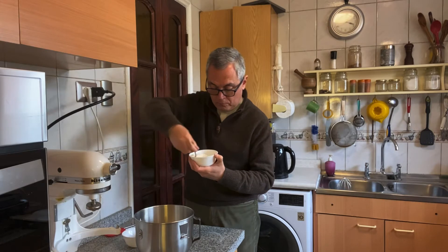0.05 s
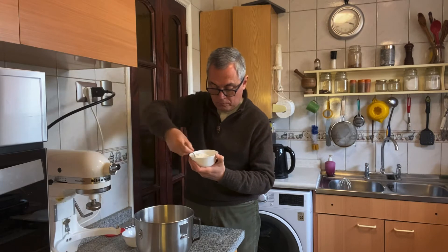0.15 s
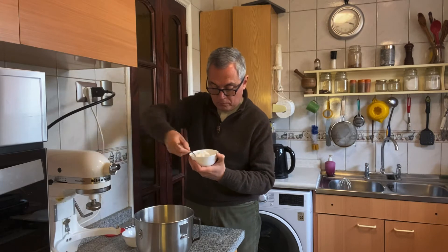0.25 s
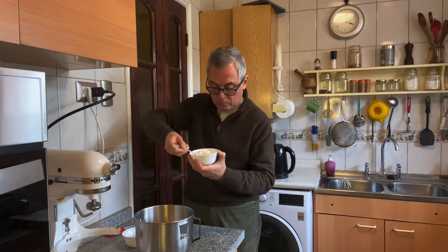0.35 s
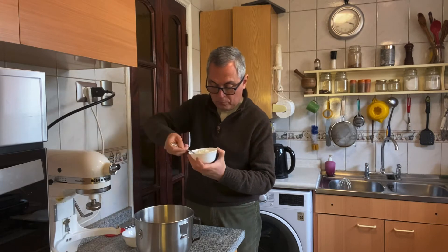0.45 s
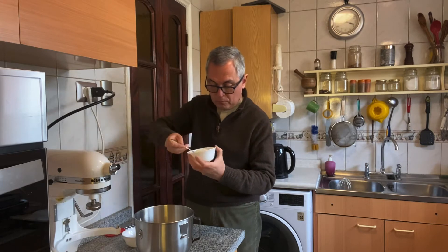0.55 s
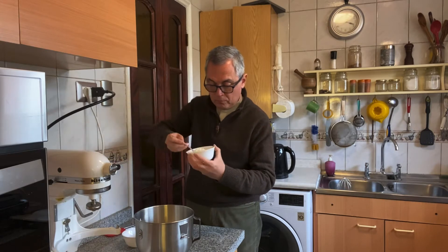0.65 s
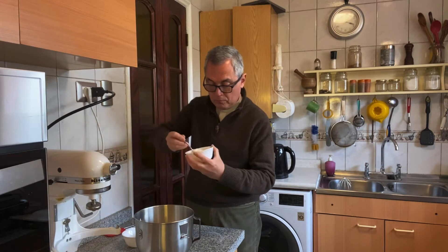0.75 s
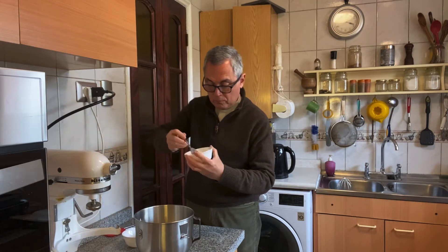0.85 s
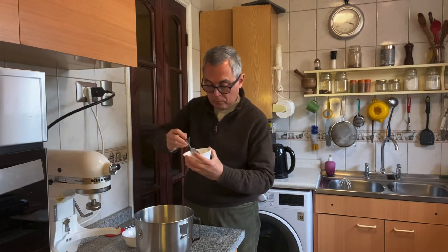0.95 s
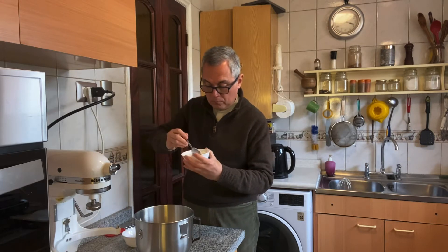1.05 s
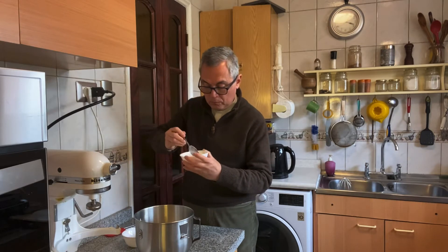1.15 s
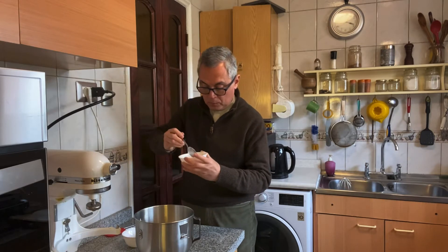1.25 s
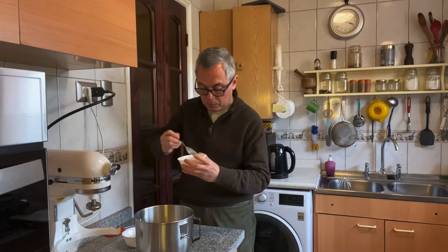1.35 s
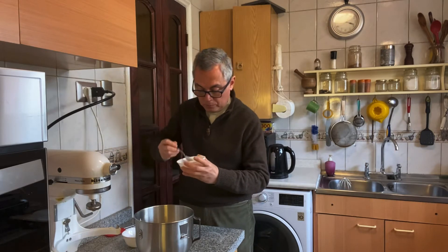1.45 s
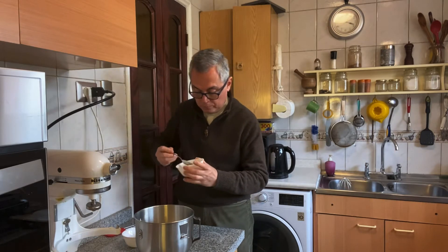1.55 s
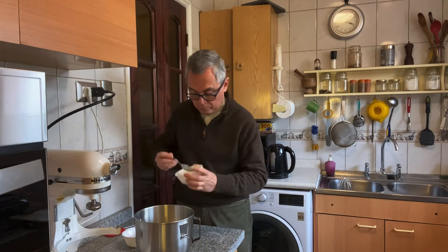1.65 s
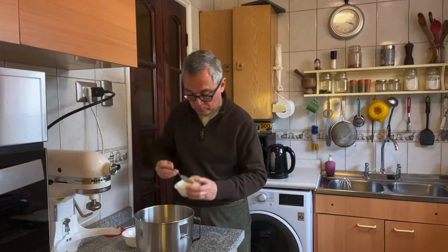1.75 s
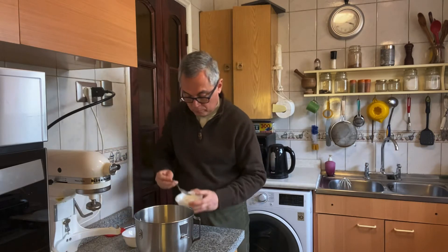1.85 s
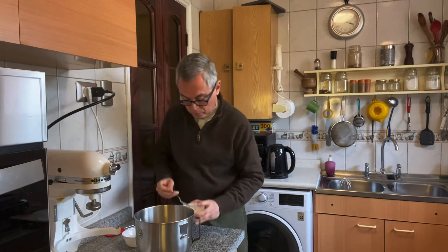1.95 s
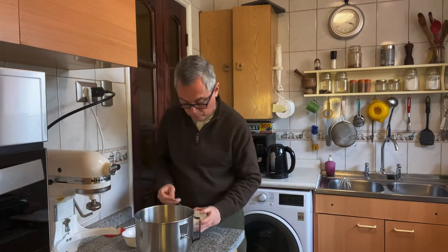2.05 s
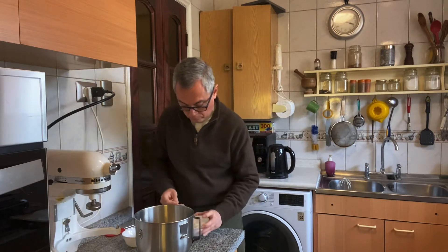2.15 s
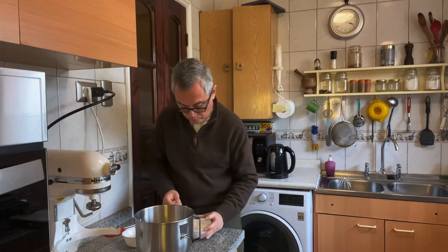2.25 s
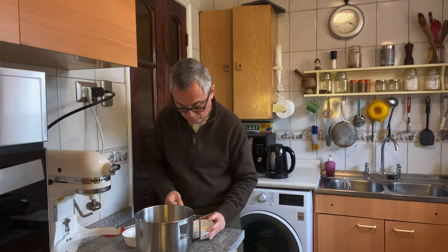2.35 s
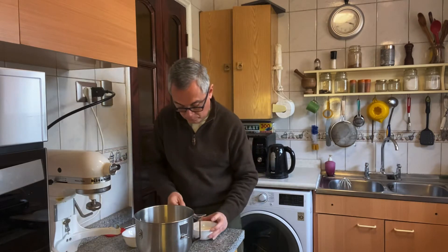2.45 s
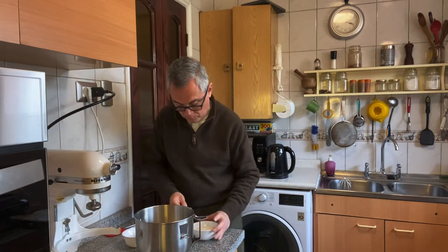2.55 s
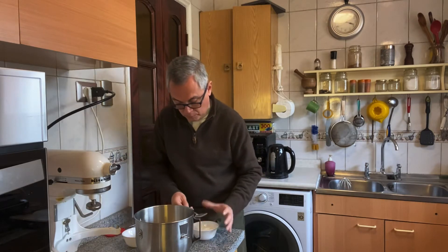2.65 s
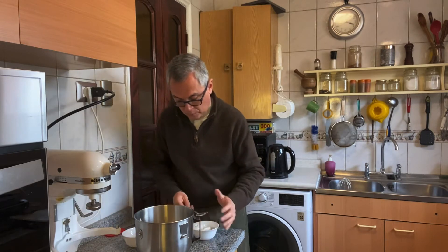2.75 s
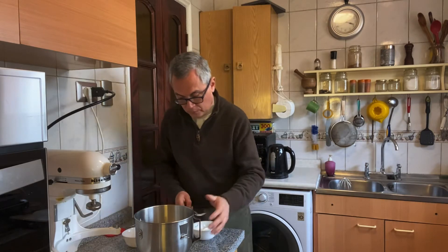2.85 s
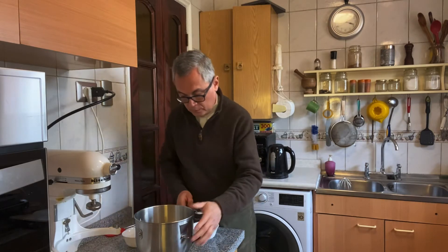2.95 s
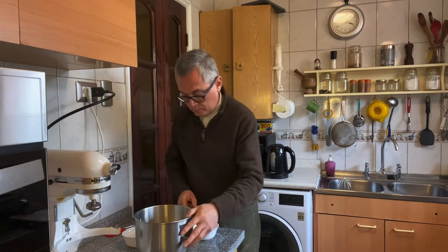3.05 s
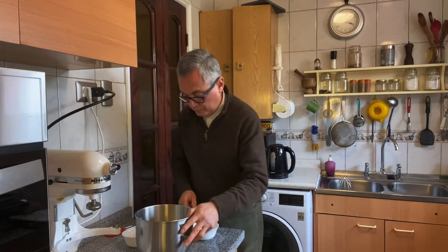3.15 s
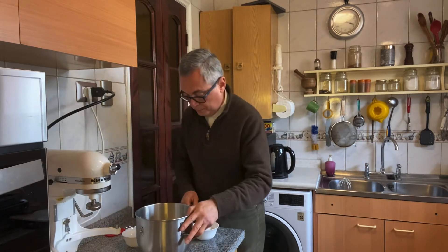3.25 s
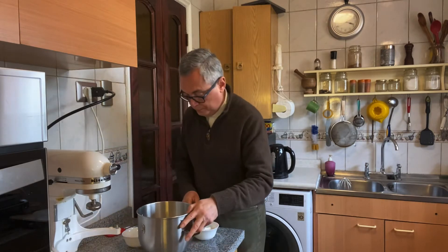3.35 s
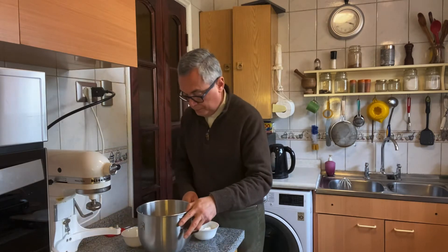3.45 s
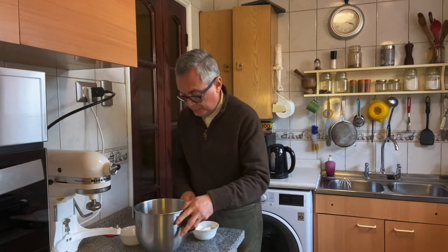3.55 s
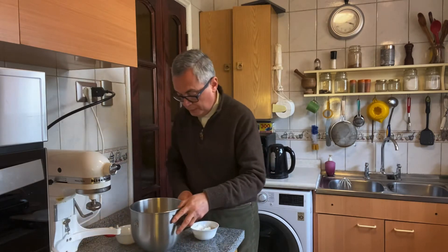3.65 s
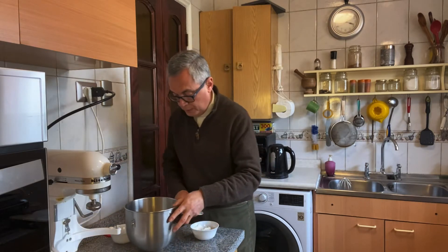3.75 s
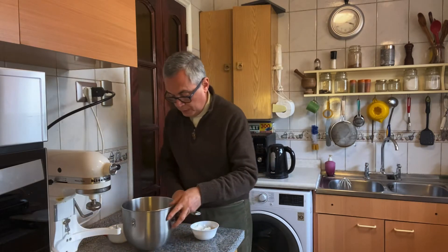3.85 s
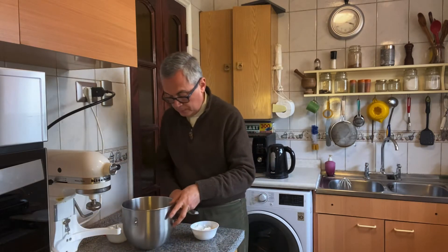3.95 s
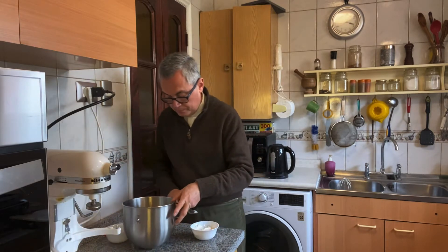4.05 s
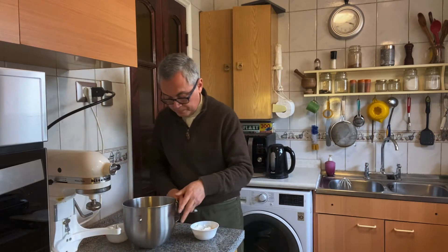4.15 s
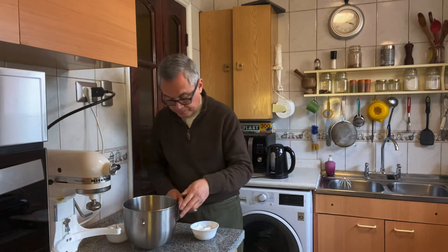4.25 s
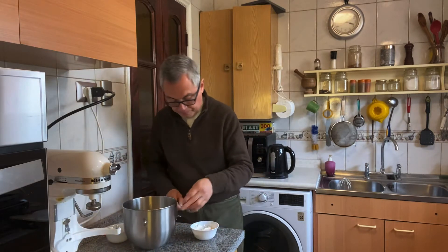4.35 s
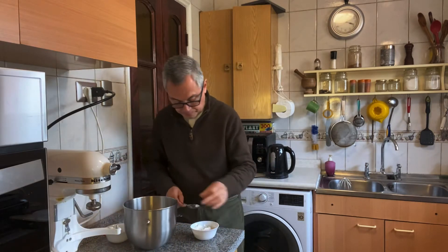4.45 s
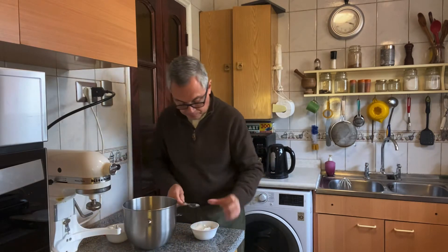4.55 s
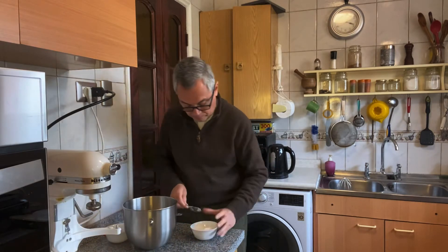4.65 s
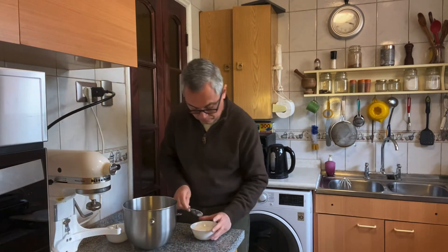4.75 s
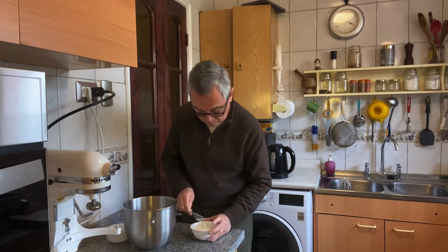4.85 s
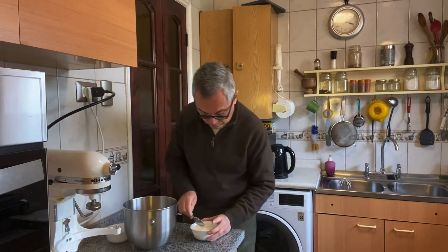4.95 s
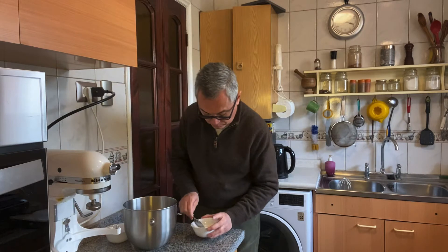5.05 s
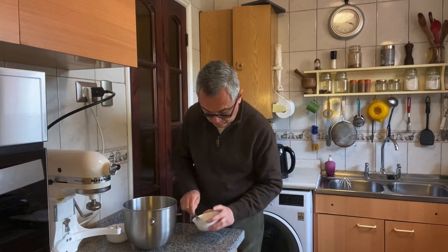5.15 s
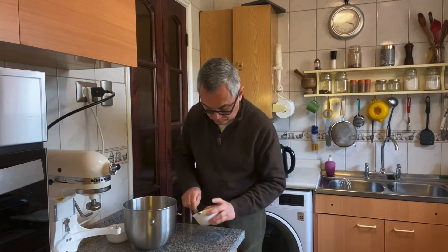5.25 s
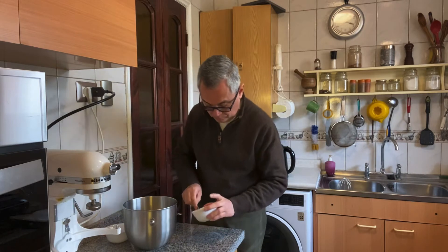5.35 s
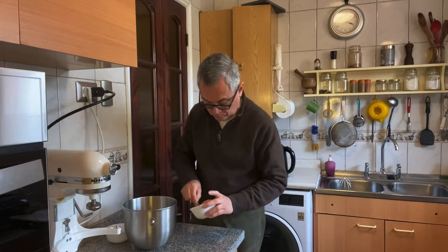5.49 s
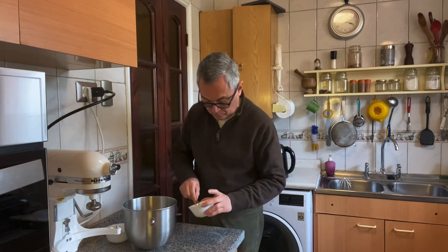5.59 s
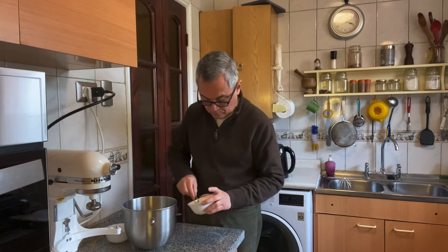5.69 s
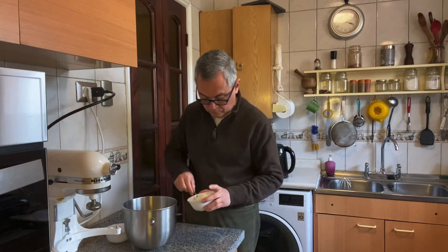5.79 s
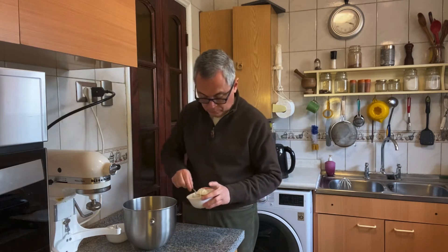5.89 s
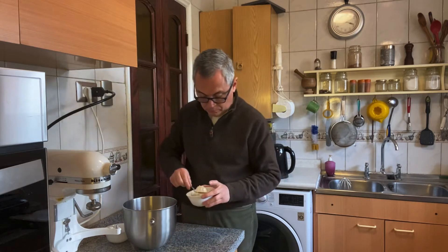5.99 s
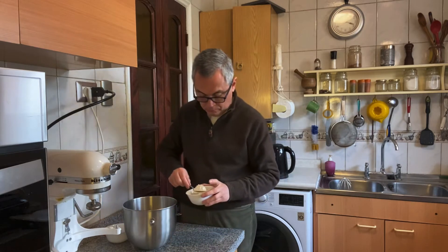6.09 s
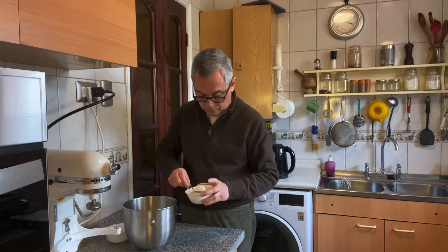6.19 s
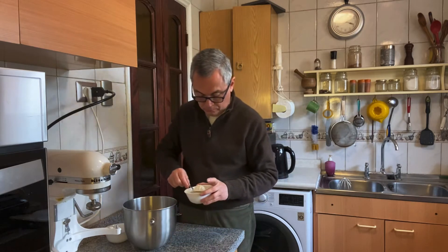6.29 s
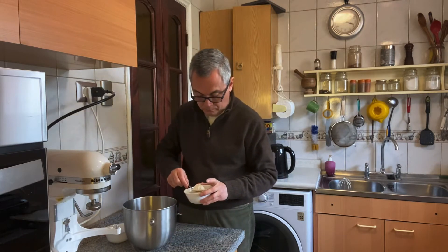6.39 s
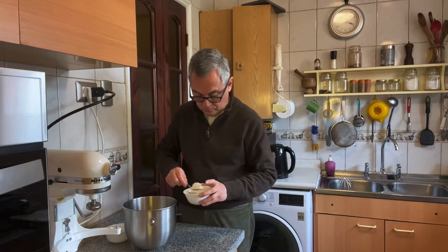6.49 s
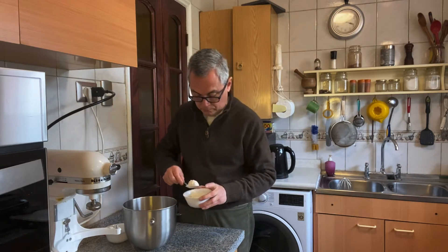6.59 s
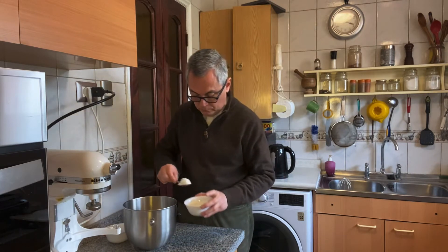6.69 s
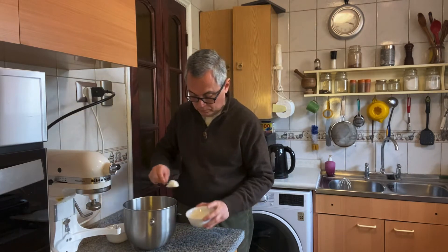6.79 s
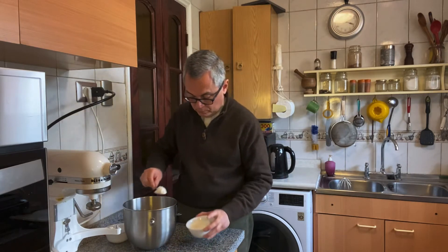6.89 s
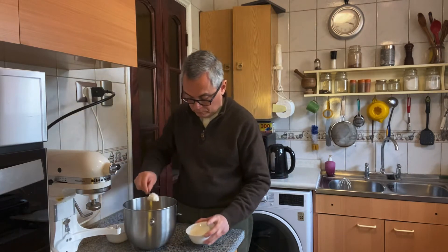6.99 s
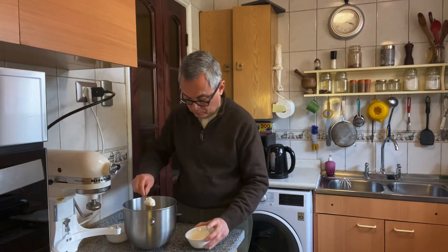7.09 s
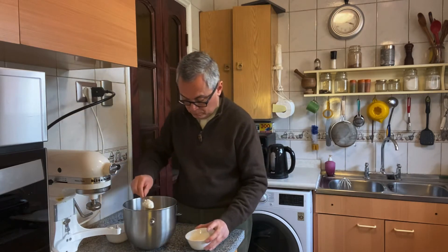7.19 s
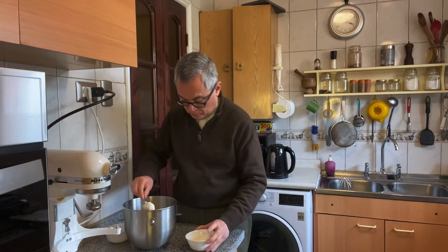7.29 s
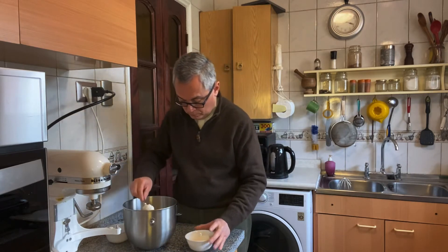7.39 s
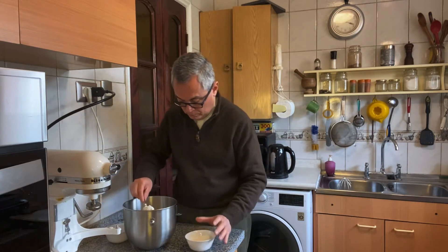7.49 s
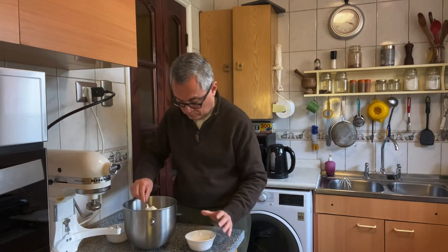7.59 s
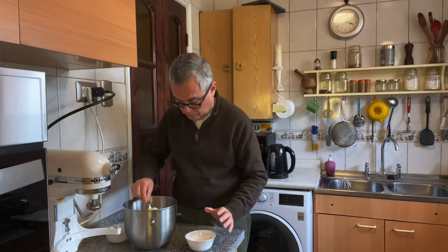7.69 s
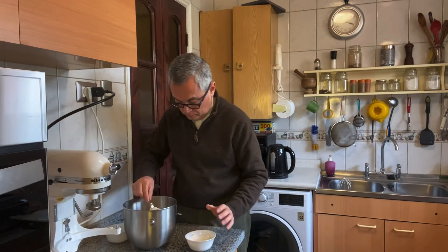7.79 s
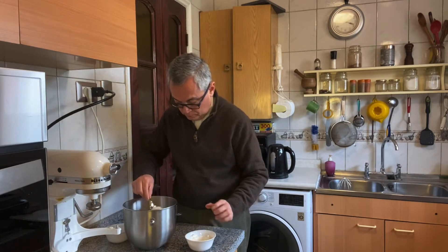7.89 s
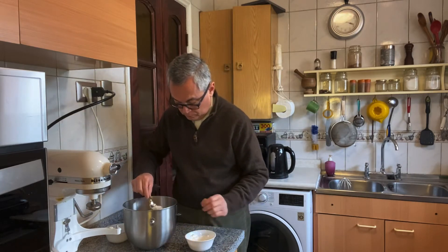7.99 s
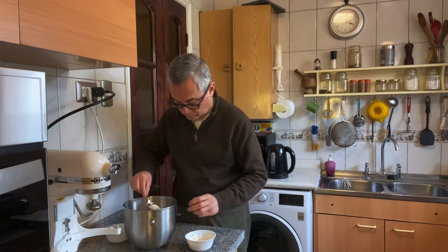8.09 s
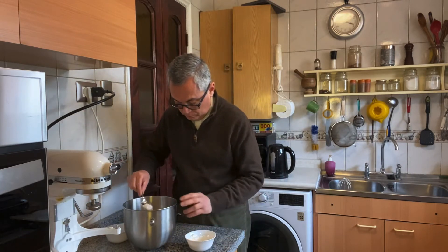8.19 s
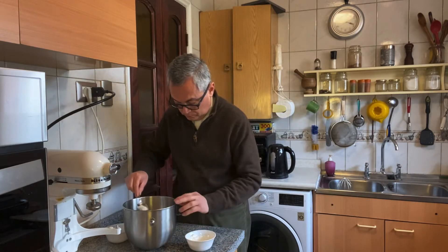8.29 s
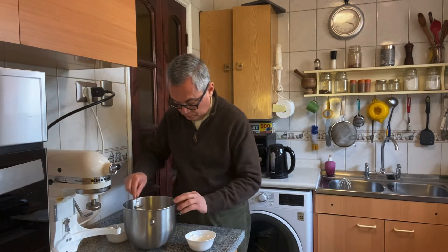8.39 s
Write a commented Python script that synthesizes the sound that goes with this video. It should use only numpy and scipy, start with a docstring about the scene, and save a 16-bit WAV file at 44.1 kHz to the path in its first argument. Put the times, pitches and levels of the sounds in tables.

```python
"""A tiled kitchen heard through two close microphone ports, over faint room noise and an uneven low rumble.
From the start a spoon crunches through flour in a small ceramic bowl, and a wall clock ticks throughout.
The ceramic bowl lands hard on the stone worktop at 2.3 s: filtered impacts over a short modal ring.
From 3.1 s a steel mixing bowl is dragged over the stone: noise grinds, slips judder, beating wall modes
sing, and modal thumps rock it to rest by 4.8 s. More scooping follows; the ceramic bowl lands hard at 7.2 s."""
import sys
import numpy as np
from scipy import signal
from scipy.fft import rfft, irfft
from scipy.io import wavfile
from scipy.ndimage import uniform_filter1d

SR = 44100
rng = np.random.default_rng(int(sys.argv[2]) if len(sys.argv) > 2 else 0)


def store_wav(level_fs):
    """Save 16-bit WAV to argv[1]."""
    pcm = np.round(np.clip(np.atleast_2d(level_fs), -1, 1) * 32767)
    wavfile.write(sys.argv[1], SR, pcm.T.astype(np.int16))


N = 371763
TIME = np.arange(N) / SR
AGE = np.arange(SR) / SR  # one second after a blow


def undb(db):
    """Decibels to gain."""
    return 10 ** (np.asarray(db) / 20)


def unit(x):
    """Scale to rms 1."""
    return x / np.sqrt(np.mean(x ** 2))


def blow(x):
    """Scale so that the energy equals 10 ms at rms 1."""
    return x / np.sqrt(np.sum(x ** 2) / (.01 * SR))


def at(points, hz):
    """Read (Hz, value) points on a log-frequency axis."""
    f, value = np.transpose(points)
    return np.interp(np.log(np.maximum(hz, 1)), np.log(f), value)


def colour(x, points):
    """Causal minimum-phase filter with the given (Hz, dB) response."""
    size = 8192
    hz = np.arange(size // 2 + 1) * SR / size
    cepstrum = irfft(np.log(undb(at(points, hz))))
    # folding the cepstrum forward in time makes the filter causal
    cepstrum[1:size // 2] *= 2
    cepstrum[size // 2 + 1:] = 0
    impulse = irfft(np.exp(rfft(cepstrum)))
    return signal.fftconvolve(x, impulse)[:len(x)]


def cut(x, hz, kind, order):
    """Low- or high-pass."""
    sos = signal.butter(order, min(hz, SR / 2 - 1), kind, fs=SR, output="sos")
    return signal.sosfilt(sos, x)


def noise(points):
    """Coloured noise at rms 1."""
    return unit(colour(rng.standard_normal(N), points))


def walk(rate, count=N):
    """Smooth chance at rms 1, with about `rate` new values per second."""
    step = int(SR / rate)
    knots = rng.standard_normal(count // step + 2)
    path = np.interp(np.arange(count) / step, np.arange(len(knots)), knots)
    return unit(uniform_filter1d(path, step // 2))


def decay(age, t60):
    """Free exponential decay, losing 60 dB in t60 seconds."""
    return np.exp(-np.log(1000) * age / t60)


def fade(t60):
    """Free decay after a blow."""
    return decay(AGE, t60)


def contact(t60, chatter):
    """One sharp impact followed by a dying chatter of tiny ones."""
    tiny = unit(rng.standard_normal(SR) * fade(t60)) / np.sqrt(SR)
    return blow((AGE == 0) + chatter * tiny)


def ring(modes):
    """Damped modes set swinging by a blow; each blow shares its energy among them a little differently."""
    out = np.zeros(SR)
    for hz, db, t60 in modes:
        gain = undb(db + rng.standard_normal())
        out += gain * fade(t60) * np.sin(2 * np.pi * hz * AGE)
    return out


def resonate(x, hz, width_hz):
    """One resonance, at gain 1 in its centre."""
    return signal.lfilter(*signal.iirpeak(hz, hz / width_hz, fs=SR), x)


def swell(middle_s, half_s):
    """A bell-shaped rise and fall, down to 1/e at half_s either side."""
    return np.exp(-((TIME - middle_s) / half_s) ** 2)


def push(start_s, length_s, t60):
    """Force of one stroke: a quick attack, a sagging hold, a free release."""
    attack_s, sag_db_per_s = 0.0047, 5
    age = np.maximum(TIME - start_s, 0)
    hold = (1 - np.exp(-age / attack_s)) * undb(-sag_db_per_s * age)
    return hold * decay(np.maximum(age - length_s, 0), t60)


def add(track, s, x):
    """Mix a sound in at time s."""
    i = max(int(s * SR), 0)
    track[i:i + len(x)] += x[:N - i]


# Stereo width at the two ports. Each row: frequency in Hz, side minus mid in dB.
PORT_WIDTH = [(60, -25), (200, -9), (600, -10.5), (1400, -9.5), (3000, -12.5), (5000, -23), (8000, -25.5),
              (12000, -35)]


def stereo(mid, side):
    """Left and right from two close microphone ports."""
    return mid + colour(side, PORT_WIDTH) * np.array([[1], [-1]])


# Spectrum of the kitchen's standing air. Each row: frequency in Hz, level in dB.
AIR_SPECTRUM = [(120, -38), (200, -2), (590, -9), (709, -7.5), (986, -10.5), (1500, -9.5), (2050, -13),
                (2330, -17), (2610, -14.5), (4200, -15.5), (7970, -25), (10300, -24), (14900, -33),
                (16000, -43)]


def room_noise(level_db=-58.3, side_db=-3, side_top_hz=3800):
    """Faint steady air, wide below about 4 kHz and narrow above."""
    side = undb(side_db) * cut(noise(AIR_SPECTRUM), side_top_hz, "low", order=3)
    return stereo(noise(AIR_SPECTRUM), side) * undb(level_db + 0.69 * walk(4))


# Louder bumps in the rumble. Each row: middle in seconds, level in dB, frequency in Hz.
RUMBLE_BUMPS = [(0.762, -19.0, 76.5), (1.161, -24.5, 53.0), (1.532, -24.5, 53.0), (1.844, -25.5, 46.7),
                (1.936, -25, 66.0), (2.04, -26.5, 66.0), (2.259, -22, 72), (2.488, -22.5, 64.0),
                (2.749, -19, 66), (3.562, -19, 64), (4.108, -25.5, 47.3), (4.876, -23.5, 72),
                (5.221, -14, 85), (5.851, -20.5, 43.3), (5.96, -23, 53.0), (6.2, -20.5, 63),
                (6.83, -25.0, 64.5), (6.997, -23, 71), (7.116, -20, 65.0), (7.317, -25, 53.5),
                (8.239, -19.5, 58.0), (8.352, -26.5, 49)]
# Spectrum of the rumble between them. Each row: frequency in Hz, level in dB.
RUMBLE_SPECTRUM = [(11, -35.5), (18, -4.5), (43, 3), (81, -0.5), (115, -10.5), (212, -29), (244, -28.5),
                   (325, -60), (400, -38.5), (520, -56.5), (880, -120)]


def rumble(bump_s=0.0093, surge_db=-11, surge_s=0.032, side_db=-12):
    """A deep rumble swells at random and surges round soft bumps of a cycle or two; nearly equal at both ports."""
    base_db, swell_db, swells_per_s = -39.5, 3.5, 11
    level = undb(base_db + swell_db * walk(swells_per_s))
    bumps = np.zeros(N)
    for s, db, hz in RUMBLE_BUMPS:
        level = level + undb(db + surge_db) * swell(s, surge_s)
        bumps += undb(db) * swell(s, bump_s) * np.sin(2 * np.pi * hz * (TIME - s))
    mid = noise(RUMBLE_SPECTRUM) * level + bumps
    side = undb(side_db) * noise(RUMBLE_SPECTRUM) * level
    return stereo(mid, side)


# Strokes of the spoon through flour. Each row: start in seconds, length in seconds, relative level in dB.
SPOON_STROKES = [(0.048, .01, -51.5), (0.128, 0.071, -57.5), (0.306, 0.18, -55.5), (0.531, .012, -50.5),
                 (5.483, 0.018, -49), (5.58, .03, -65)]
# Spectrum of the flour's crunch. Each row: frequency in Hz, level in dB.
FLOUR_SPECTRUM = [(290, -44), (500, -4), (655, -18), (790, -14), (1140, -1), (1640, -11.5), (4210, -20.5),
                  (6000, -24), (7800, -54), (13200, -120)]


def spoon(level_db=-3, release_t60_s=0.12):
    """The spoon crunches softly through flour: noise follows the force of each stroke."""
    force = sum(undb(db) * push(s, length_s, release_t60_s) for s, length_s, db in SPOON_STROKES)
    return noise(FLOUR_SPECTRUM) * force * undb(level_db + 1.6 * walk(50))


# Faint resonant swells around the bowls. Each row: middle in seconds, half length in seconds,
# relative level in dB, resonance in Hz, its width in Hz.
RESONANT_SWELLS = [(0.19, 0.028, -56, 744, 500), (3.252, 0.092, -54, 1720, 2010),
                   (3.4, 0.11, -49, 4430, 800), (3.412, 0.098, -44.5, 326, 256),
                   (4.113, 0.077, -56, 1278, 60), (4.19, 0.055, -62, 2850, 80),
                   (4.167, 0.051, -51, 302, 219), (4.504, 0.13, -57.5, 2160, 1400),
                   (5.59, 0.044, -54.5, 354, 330)]


def faint_swells():
    """Faint resonant swells around the bowls: soft rubs, rattle and lingering steel tones, some overlapping."""
    out = np.zeros(N)
    for s, half_s, db, hz, width_hz in RESONANT_SWELLS:
        once = resonate(rng.standard_normal(SR), hz, width_hz)
        tone = unit(resonate(once, hz, width_hz))
        out += np.resize(tone, N) * undb(db) * swell(s, half_s)
    return out


# Spectrum of the escapement's click. Each row: frequency in Hz, level in dB.
CLICK_SPECTRUM = [(500, -5), (1000, -21.5), (1500, 6), (2300, -9.5), (3300, 2.5), (4900, 3), (6500, -4.5),
                  (8000, -13.5), (10500, -4.5), (13000, -24), (15500, -10)]
# Modes of the clock's case. Each row: frequency in Hz, relative level in dB, t60 in seconds.
CASE_MODES = [(3330, 0, .1), (4360, -2, .1), (4780, 0, .1), (5130, -4, .08), (6050, -7, .08),
              (6900, -9, .08)]


def clock(case_db=-6, tick_db=-47.5, tock_db=-54.5):
    """The escapement clicks in a small plastic case, strong and weak in turn; its pace wanders a little."""
    # the weak tock falls just under half way between two strong ticks
    first_tick_s, period_s, tock_after_s = .496, .50973, .2405
    wander_s, wander_ticks = .0027, 13  # the wander's reach, and ticks per cycle of it
    out = np.zeros(N)
    for beat in range(-1, int(N / SR / period_s)):
        wander = wander_s * np.sin(2 * np.pi * beat / wander_ticks)
        tick_s = first_tick_s + beat * period_s + wander
        for s, db in ((tick_s, tick_db), (tick_s + tock_after_s, tock_db)):
            click = blow(colour(contact(t60=0.038, chatter=7), CLICK_SPECTRUM))
            case = undb(case_db) * blow(ring(CASE_MODES))
            if 0 < s < N / SR:
                add(out, s, undb(db) * blow(click + case))
    return out


# Ceramic bowl meeting the stone or the spoon. Each row: start in seconds, relative level in dB,
# contact cut-off in Hz, low cut in Hz, chink in dB, strongest resonance in Hz, its level in dB.
CERAMIC_KNOCKS = [(0.5452, -55.5, 2450, 795, -11, 1020, 2), (2.3083, -13, 2920, 422, -25.5, 885, -21),
                  (2.508, -32, 1540, 870, -33, 818, -2), (5.494, -49, 3200, 700, -9, 2500, -14),
                  (5.595, -50, 3000, 300, -11, 527, -2), (7.1671, -14.5, 3260, 510, -23, 2213, -6.5),
                  (7.359, -22.5, 3300, 805, -25, 1385, -3)]
# Modes of the ceramic bowl on the worktop. Each row: frequency in Hz, relative level in dB, t60 in seconds.
CERAMIC_MODES = [(486, -4, .14), (608, -6, .12), (684, -3, .2), (788, -4, .13), (965, -4, .13),
                 (1170, -2, .18), (1240, -4, .12), (1292, -3, .12), (1415, -7, .14), (1630, -8, .12),
                 (1760, -7, .14), (1843, -6, .16), (1973, -6, .15), (2176, -1, .16), (2310, -5, .1),
                 (2485, -4, .15), (2640, -6, .12), (3130, -9, .12)]
# Spectra of the hard clack and the high chink. Each row: frequency in Hz, level in dB.
CLACK_SPECTRUM = [(100, -3), (200, 3), (350, -10), (520, 1), (780, 3.5), (1000, 0), (1300, .5), (1650, -2),
                  (2300, -1.5), (3100, -2.5), (4100, -8), (5500, -16), (16000, -25)]
CHINK_SPECTRUM = [(2000, -25), (4500, -4), (5800, -3), (7500, 0), (9000, -8), (11700, -7), (12400, 1),
                  (13300, -4), (14300, 0), (15000, -6), (15700, -35)]


def ceramic_bowl(ring_db=-6, width_hz=75):
    """Hard clacks and the short ring behind them; a softer contact is duller, each spot favours one resonance."""
    def soften(x, contact_hz, low_hz):
        """The contact's softness limits the treble; the low cut thins the bass."""
        dull = cut(x, contact_hz, "low", order=3)
        return blow(cut(dull, low_hz, "high", order=1))

    out = np.zeros(N)
    for s, db, contact_hz, low_hz, chink_db, body_hz, body_db in CERAMIC_KNOCKS:
        hit = contact(t60=0.017, chatter=1.64)
        clack = soften(colour(hit, CLACK_SPECTRUM), contact_hz, low_hz)
        tone = soften(ring(CERAMIC_MODES), contact_hz, low_hz)
        body = blow(np.exp(-np.pi * width_hz * AGE) * np.sin(2 * np.pi * body_hz * AGE))
        chink = blow(colour(hit, CHINK_SPECTRUM))
        knock = clack + undb(ring_db) * tone + undb(body_db) * body + undb(chink_db) * chink
        add(out, s, undb(db) * knock)
    return out


# Sleeves and hands brushing past. Each row: middle in seconds, half length in seconds, relative level in dB.
SLEEVE_BRUSHES = [(2.69, 0.15, -59), (7.64, 0.094, -61), (7.992, 0.22, -58.5), (8.4, 0.084, -62)]
# Spectrum of a dry rasp, for cloth, skin and steel on stone. Each row: frequency in Hz, level in dB.
RASP_SPECTRUM = [(500, -14), (2000, -12), (3600, -9), (4500, -5), (5600, -4), (6400, -7), (7750, 3),
                 (9500, 0), (12000, -5), (15500, -8)]


def brushing(level_db=-3):
    """Cloth and skin brush past with a faint dry hiss."""
    touch = sum(undb(db) * swell(s, half_s) for s, half_s, db in SLEEVE_BRUSHES)
    return noise(RASP_SPECTRUM) * touch * undb(level_db + 3.2 * walk(40))


# Steel bowl pushed over the stone. Each row: start in seconds, length in seconds, relative hiss in dB,
# relative grinding in dB, release t60 in seconds.
STEEL_SLIDES = [(3.09, 0.076, -58.5, -76, .3), (3.19, .08, -52, -68, .3), (3.25, .12, -48, -68, .2),
                (3.36, .12, -44, -63, 0.22), (3.492, .21, -40, -26, 0.97), (4.016, 0.35, -62.5, -54, 0.11),
                (4.371, .2, -50, -62, 0.35), (4.673, 0.014, -53, -70, .2)]
# Spectrum of steel grinding on stone. Each row: frequency in Hz, level in dB.
GRIND_SPECTRUM = [(100, -20), (220, 6.5), (330, -1.5), (450, -5), (700, -6.5), (1000, -9.5), (1400, -5),
                  (1900, -13), (2500, -12), (3600, -16.5), (6000, -23), (12000, -24)]


def sliding(hiss_db=-3, grind_db=-2, grain_db=5, grip_waver_db=2.2):
    """Dense tiny contacts of uneven size: a fine hiss, and grinding while the steel bowl is dragged."""
    grain_gains = undb(grain_db * rng.standard_normal((2, N)))
    fine, coarse = rng.standard_normal((2, N)) * grain_gains
    power = np.zeros((2, N))
    for s, length_s, fine_db, coarse_db, t60 in STEEL_SLIDES:
        power += (undb([[fine_db], [coarse_db]]) * push(s, length_s, t60)) ** 2
    hiss_level, grind_level = np.sqrt(power)
    hiss = unit(colour(fine, RASP_SPECTRUM)) * hiss_level * undb(hiss_db + 1.0 * walk(78))
    grind_gain = undb(grind_db + grip_waver_db * walk(60))
    grind = unit(colour(coarse, GRIND_SPECTRUM)) * grind_level * grind_gain
    return hiss + grind


# Steel bowl's foot slipping and catching. Each row: start in seconds, relative judder in dB, relative rasp in dB.
FOOT_SLIPS = [(3.177, -49.5, -50), (3.379, -54, -48), (3.4948, -18, -20), (3.512, -27.5, -30),
              (3.5745, -17.5, -23), (3.632, -25, -32), (3.673, -34, -32), (3.703, -32.5, -34),
              (3.824, -59, -44), (3.937, -45.5, -51)]
# Spectrum of the shaken bowl. Each row: frequency in Hz, level in dB.
JUDDER_SPECTRUM = [(60, -0.5), (130, 1), (210, 3.5), (300, 7.5), (430, -8), (560, -6.5), (680, 5.5),
                   (800, 4), (1000, -8), (1400, -5.5), (2400, -9.5), (3600, -28), (6000, -38)]
# Modes of the steel wall, struck by slips and fed by friction. Each row: frequency in Hz, relative level in dB,
# twin mode's offset in Hz, twin's relative level in dB, build-up in seconds, time fed until in seconds,
# t60 in seconds.
STEEL_MODES = [(369, -31.5, 13, -10, .006, 3.775, .5), (532, -43, 6, -10, .004, 3.66, .5),
               (799, -40, 9, -8, .004, 3.66, .45), (1167, -28, 19, -7, .025, 3.755, .36),
               (2861, -27, 8, -9, .045, 3.725, .21), (5087, -34, 7, -6, .004, 3.68, .34),
               (7790, -42, 24, -4, .003, 3.62, .35), (9140, -48, 17, -5, .003, 3.62, .31),
               (10820, -50, 14, -6, .004, 3.62, .4)]


def steel_slips(strike_db=-6):
    """The foot catches and jumps: each slip shakes the bowl, strikes its wall afresh and rasps on the stone."""
    out = np.zeros(N)
    wall = [(hz, db, t60) for hz, db, *_, t60 in STEEL_MODES]
    for s, judder_db, rasp_db in FOOT_SLIPS:
        judder = blow(colour(contact(t60=0.074, chatter=11.0), JUDDER_SPECTRUM))
        rasp = blow(colour(contact(t60=.07, chatter=3.7), RASP_SPECTRUM))
        add(out, s, undb(judder_db) * judder)
        add(out, s, undb(rasp_db) * rasp)
        add(out, s, undb(judder_db + strike_db) * blow(ring(wall)))
    return out


# Steel bowl rocking on the worktop. Each row: start in seconds, relative thump in dB, rise in seconds,
# relative clack in dB.
ROCKING_THUMPS = [(3.334, -26, 0.0015, -56), (3.403, -32, 0.0023, -74), (4.264, -9, 0.017, -33),
                  (4.335, -24.5, 0.0027, -67), (4.388, -24.5, 0.0043, -64), (4.4637, -17.5, 0.0022, -50.5),
                  (4.547, -25.5, 0.0016, -52), (4.602, -22, 0.0018, -54), (4.647, -24.5, 0.0017, -58.5),
                  (4.716, -30, 0.022, -68), (4.77, -30, 0.001, -77)]
# Modes of the steel base against the worktop. Each row: frequency in Hz, relative level in dB, t60 in seconds.
WORKTOP_MODES = [(155, -8, .13), (188, -11, .1), (209, 1.5, .12), (266, -13, .14), (300, -14, .13),
                 (371, -24, .35), (440, -30, .12), (660, -30, .14), (810, -30, .14)]
# Modes of the steel wall as the base lands. Each row: frequency in Hz, relative level in dB, t60 in seconds.
CLANK_MODES = [(775, 0, .2), (850, -5, .15), (1240, -7, .2), (1750, -9, .2), (1890, -9, .2),
               (2970, -13, .16), (4350, -18, .2)]


def rocking(thump_db=5.5, clank_db=2, grit_db=9.0):
    """The steel base thumps the worktop and its wall clanks; a slow rolling contact lets the sound swell."""
    out = np.zeros(N)
    for s, db, rise_s, clack_db in ROCKING_THUMPS:
        rise = 1 - np.exp(-AGE / rise_s)
        thump = ring(WORKTOP_MODES) * rise
        add(out, s, undb(db + thump_db) * thump / np.abs(thump).max())
        grit = colour(contact(t60=0.36, chatter=5.9) * np.sqrt(rise), GRIND_SPECTRUM)
        grit = blow(cut(grit, hz=5500, kind="low", order=1))
        add(out, s, undb(clack_db + grit_db) * grit)
        add(out, s, undb(clack_db + clank_db) * blow(ring(CLANK_MODES) * rise))
    return out


def steel_song(start_s=3.495):
    """Friction pumps the wall's modes, each beating with its twin; they ring out once the feeding stops."""
    out = np.zeros(N)
    time = start_s + AGE
    for hz, db, split_hz, twin_db, build_s, until_s, t60 in STEEL_MODES:
        build_up = 1 - np.exp(-AGE / build_s)
        swing = build_up * decay(np.maximum(time - until_s, 0), t60)
        # the uneven grip nudges phase (radians) and level (dB)
        phase = 2 * np.pi * hz * AGE + .3 * walk(70, count=SR)
        level = undb(db + walk(67.8, count=SR))
        pair = np.sin(phase) + undb(twin_db) * np.sin(phase + 2 * np.pi * split_hz * AGE)
        add(out, start_s, swing * level * unit(pair))
    return out


# The kitchen's reverberation. Each row: band centre in Hz, t60 in seconds.
KITCHEN_T60 = [(150, .36), (700, .31), (2000, .3), (4000, .31), (8000, .3), (14000, .27)]


def kitchen(x, onset_s=0.0017):
    """Dense reflections from tiles and cupboards; the treble dies first."""
    log_hz = np.log(np.arange(SR // 2 + 1) + 1)
    centres = np.log([f for f, _ in KITCHEN_T60])
    tails = []
    for white in rfft(rng.standard_normal((2, SR))):
        tail = np.zeros(SR)
        # overlapping bands share the noise, each with its own decay
        for share, (_, t60) in zip(np.eye(len(centres)), KITCHEN_T60):
            tail += irfft(white * np.interp(log_hz, centres, share)) * fade(t60)
        tail = unit(tail * (1 - np.exp(-AGE / onset_s))) / np.sqrt(SR)
        tails.append(signal.fftconvolve(x, tail)[:N])
    return stereo(*tails)


def placed(x, pan_db, early_db, early_t60=0.13):
    """Direct sound; the worktop's first reflections reach the two ports differently."""
    reflections = unit(rng.standard_normal(SR) * fade(early_t60)) / np.sqrt(SR)
    early = signal.fftconvolve(x, reflections)[:N]
    pan = undb(np.array([[pan_db], [-pan_db]]) / 2)
    return stereo(x, undb(early_db) * early) * pan


def scene():
    """Every source heard directly and through the kitchen, over the room noise and rumble."""
    # Each row: sound, direct in dB, room in dB, early reflections in dB, left minus right in dB.
    sources = [
        (spoon(), -3, -3, -4, 0),
        (faint_swells(), 0, -9, -6, 0),
        (clock(), -1, -4, -10, 0),
        (ceramic_bowl(), -3, 1, -3, -2),
        (brushing(), -1, -9, -12, .2),
        (sliding(), -1, -7, -2, .8),
        (steel_slips(), 0, -3, 0, .6),
        (rocking(), 0, -14, -7, -.5),
        (steel_song(), 0, -15, -4, -.5),
    ]
    direct = sum(placed(undb(db) * x, pan_db, early_db) for x, db, _, early_db, pan_db in sources)
    room = kitchen(sum(undb(room_db) * x for x, _, room_db, _, _ in sources))
    return direct + room + room_noise() + rumble()


def record(dry):
    """The microphone rounds the highest peaks and cuts the top."""
    top_hz = 15900
    rounded = np.tanh(.7 * dry) / .7
    return signal.sosfilt(signal.ellip(10, .2, 80, top_hz, fs=SR, output="sos"), rounded)


dry = scene()
out = record(dry)
store_wav(out)
```